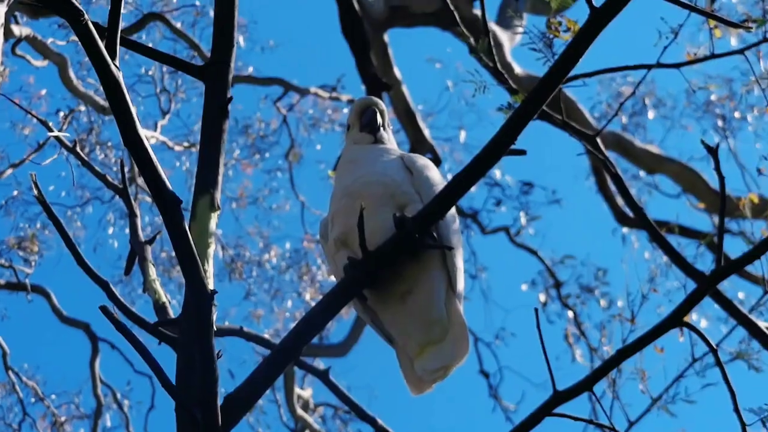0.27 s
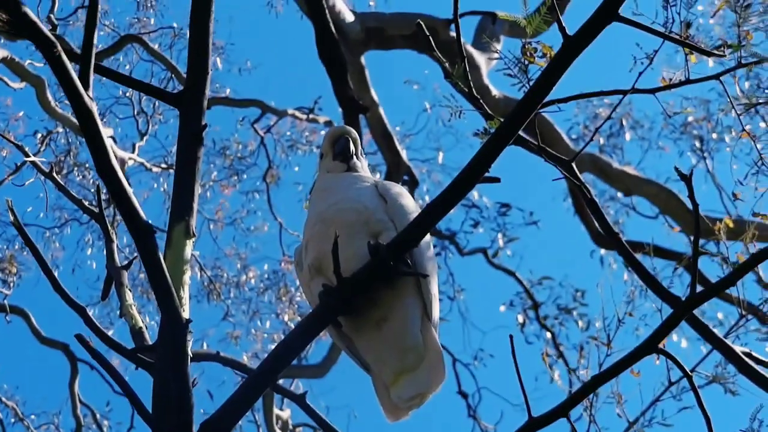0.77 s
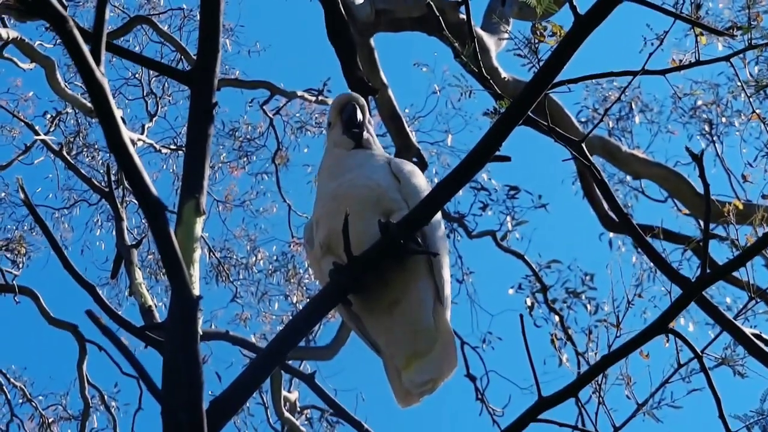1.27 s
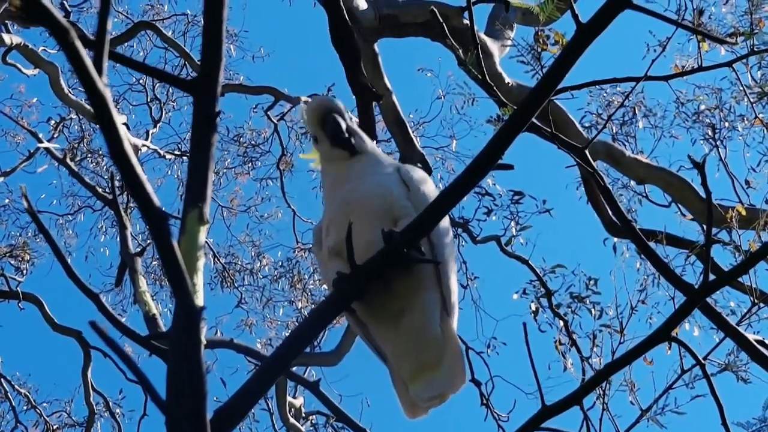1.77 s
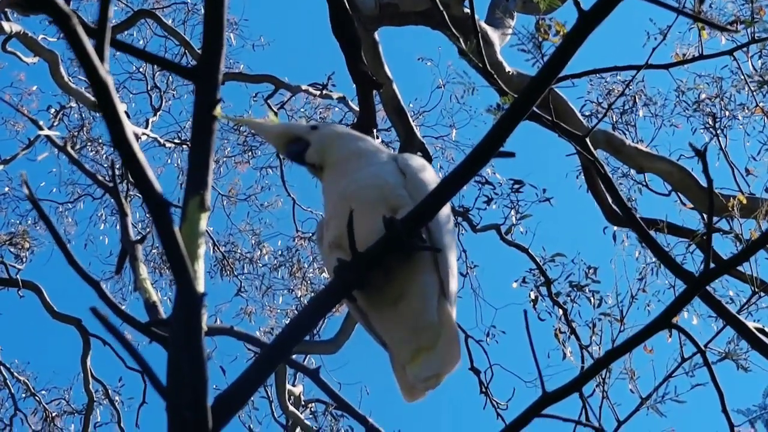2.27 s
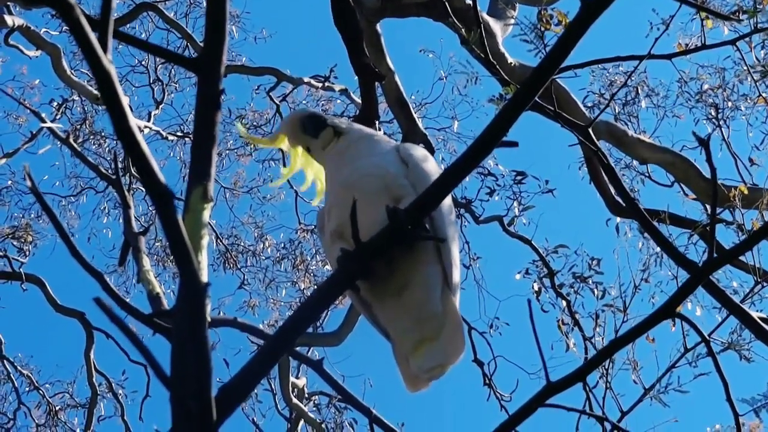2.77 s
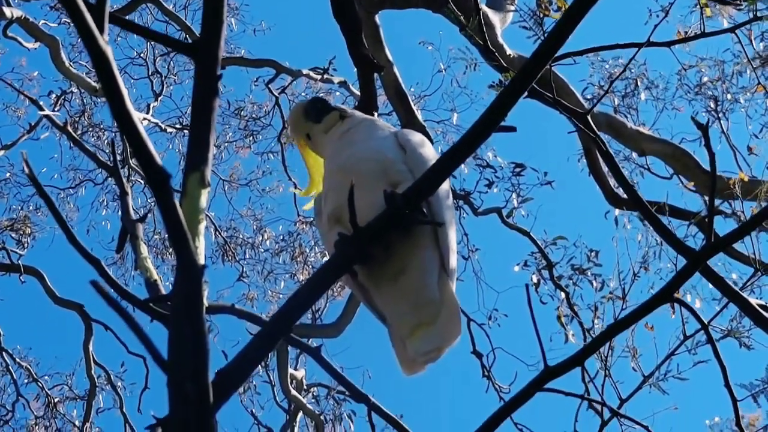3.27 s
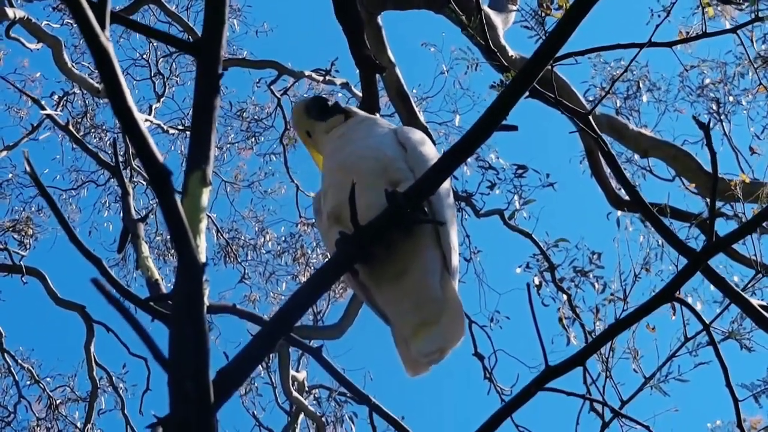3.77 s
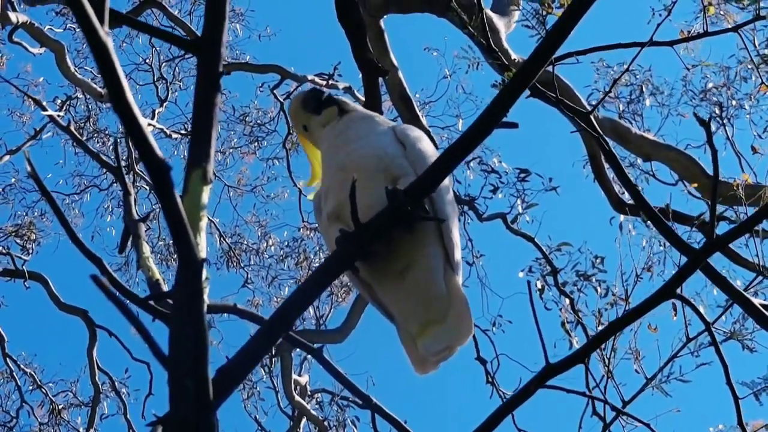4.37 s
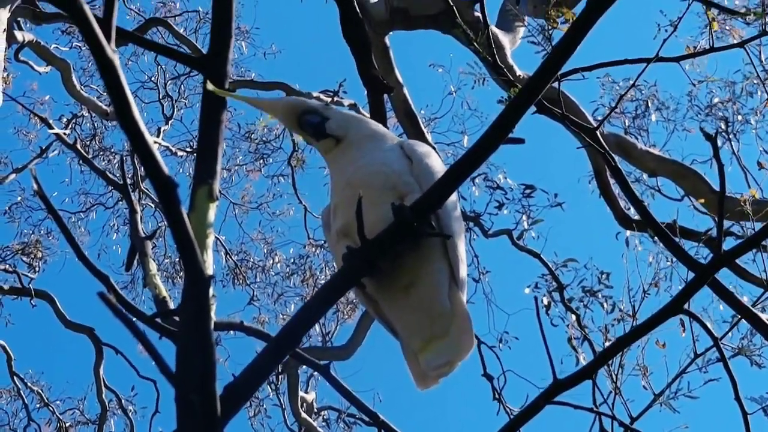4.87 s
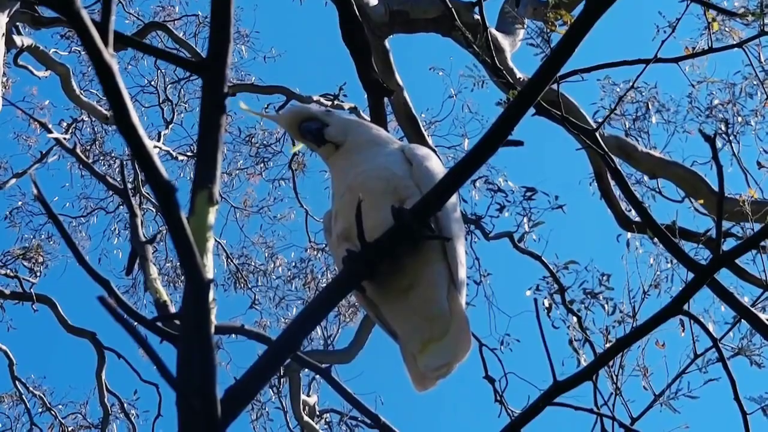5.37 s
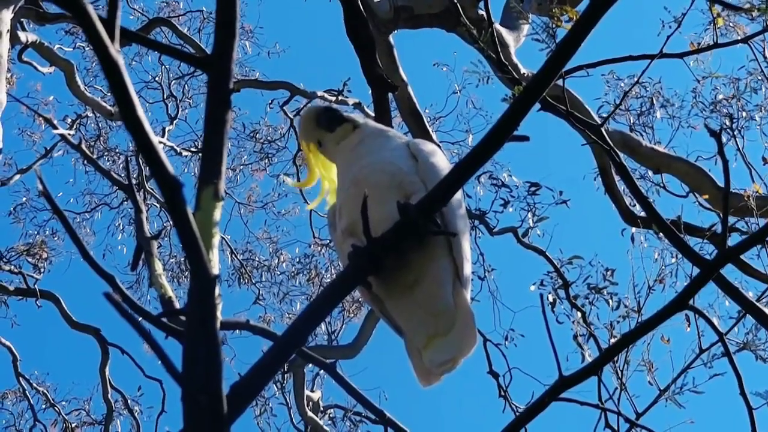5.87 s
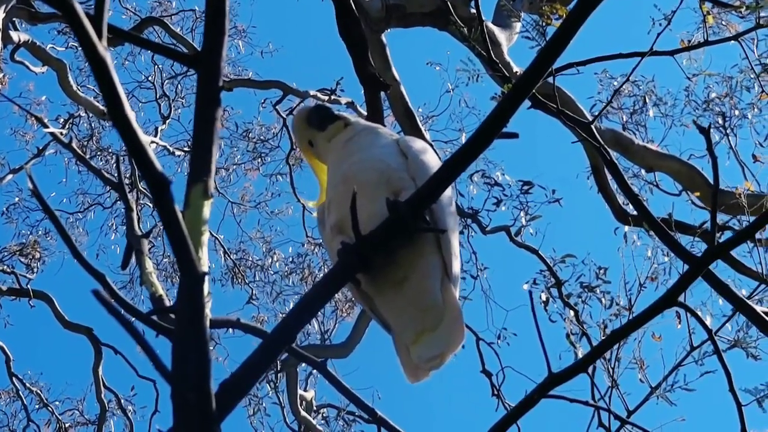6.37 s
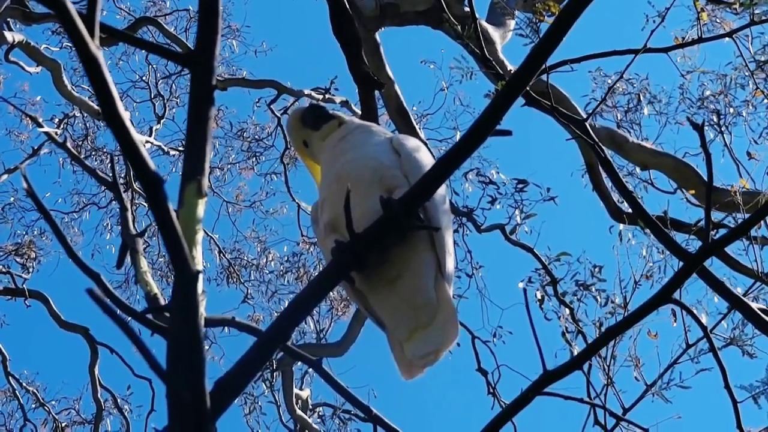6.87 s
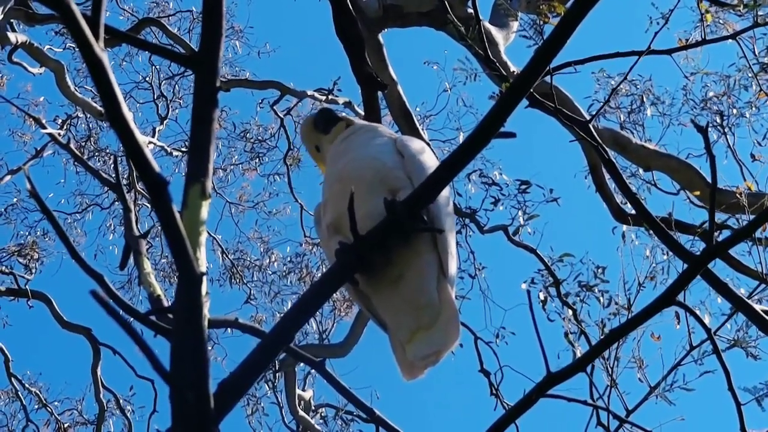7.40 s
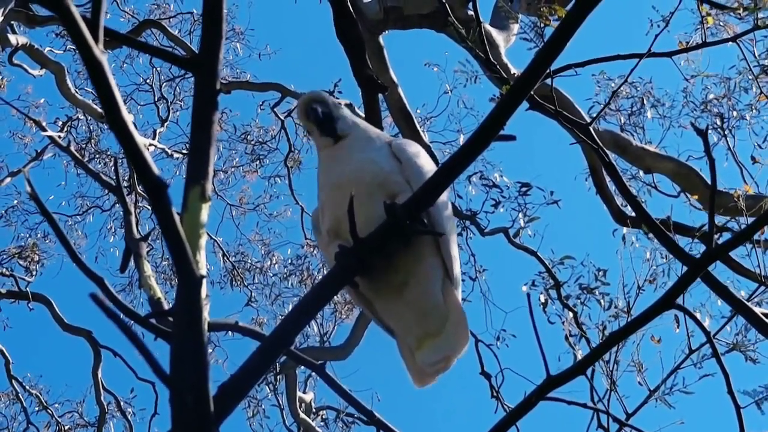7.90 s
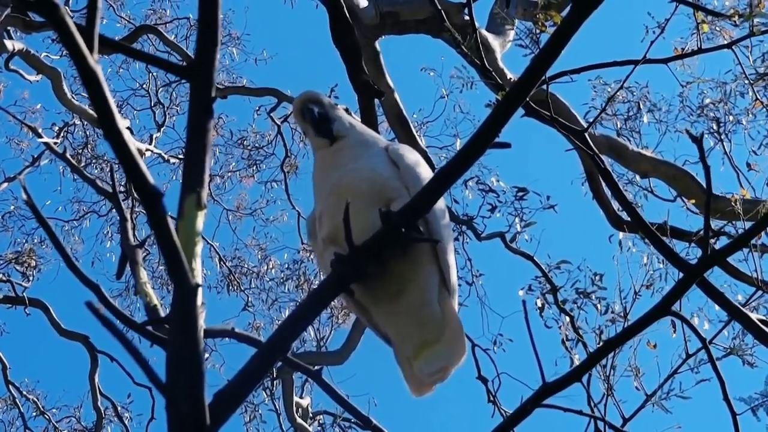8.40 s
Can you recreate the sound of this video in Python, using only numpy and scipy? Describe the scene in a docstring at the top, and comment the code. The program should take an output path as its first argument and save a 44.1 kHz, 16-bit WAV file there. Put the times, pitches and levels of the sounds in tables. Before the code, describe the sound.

Quiet outdoor air with faint hiss and low uneven rumble. In the first 0.6 s, distant small parrots give thin arched whistles, then harsh far chatter from 0.7 to 1.3 s. At 1.3 s a near cockatoo screeches for half a second: a quick upward glide, a crack into chaotic rasp, a piercing held note, a ragged break. Its echo fades among the trees while faint nasal calls repeat from 2.3 to 3.8 s. A second screech runs from 3.85 to 4.4 s, overlapped at 4.0 by a rough bark with a squeal. Single gruff barks follow at 4.5, 5.15, 6.1 and 7.2 s, some squeaky, with tiny soft rustles near 5 and 6 s and faint whistles around 6.3 to 7 s. At 7.8 s comes a very short squawk with a hollow ring, then the last screech from 8.0 to 8.5 s, with a strong bark inside it at 8.2.

```python
"""A cockatoo gives three long screeches and one short squawk, and rough barks, likely a dog's, sound among them.
Each screech is a train of throat pulses that glides up, breaks into a chaotic rasp, locks on a held note and
breaks again. The barks pass unsteady pulses and puffs of noise through mouth resonances; some carry a squeal.
Smaller parrots whistle and chatter farther off as arched tones, over filtered noise for the outdoor hiss.
Sparse noise taps return the echo off the trees, and a limiter holds the loud calls down to one ceiling."""
import sys
import numpy as np
from scipy import signal
from scipy.io import wavfile
from scipy.ndimage import uniform_filter1d, minimum_filter1d

SR = 44100
rng = np.random.default_rng(int(sys.argv[2]) if len(sys.argv) > 2 else 0)


def transcribe(signal):
    """Save signal, clipped to [-1, 1], as a 16-bit WAV file at the path in sys.argv[1]."""
    frames = np.atleast_2d(signal).T
    limited = np.clip(frames, -1, 1)
    pcm = np.round(limited * 32767).astype(np.int16)
    wavfile.write(sys.argv[1], SR, pcm)


N = 381024
EDGE_HZ = 15850  # upper limit of the sound


def amp(db):
    """Turns decibels into a gain factor."""
    return 10 ** (np.asarray(db) / 20)


def evened(x):
    """Scales a sound to an RMS level of one."""
    return x / np.sqrt(np.mean(x ** 2) + 1e-20)


def steadied(x, size=900):
    """Holds the short-time power at one, over windows of size samples."""
    power = abs(uniform_filter1d(x ** 2, size))
    return x / np.sqrt(power + 1e-12)


def read(points, hz):
    """Reads a curve of (Hz, value) points along a logarithmic frequency axis."""
    f, value = np.transpose(points)
    return np.interp(np.log(hz + 1), np.log(np.abs(f) + 1), value)


def add(mix, s, sound):
    """Lays a sound into the mix from second s on."""
    part = mix[max(round(s * SR), 0):][:len(sound)]
    part += sound[:len(part)]


def noise(count):
    """White noise, up to a second long."""
    return rng.standard_normal(SR)[:count]


def wander(count, size):
    """Slow random drift: noise smoothed twice over size samples."""
    smooth = uniform_filter1d(uniform_filter1d(noise(SR), size), size)
    return evened(smooth)[:count]


def envelope(length, attack, release, edge_db):
    """Level in dB: rises from edge_db, holds at zero and falls back."""
    t = np.arange(0, length, 1 / SR)
    edge = np.maximum(1 - t / attack, 1 - (length - t) / release)
    return edge_db * np.maximum(edge, 0)


def colour(x, spectrum, size=4096):
    """Minimum-phase filter with the given spectrum: it rings only after its input, as a resonator does."""
    log_gain = np.log(amp(read(spectrum, abs(np.fft.fftfreq(size, 1 / SR)))))
    ring = np.fft.ifft(np.exp(np.conj(signal.hilbert(log_gain)))).real
    return signal.oaconvolve(x, ring[:size // 2])[:len(x)]


def resonate(x, hz, width):
    """A steep resonance of gain one that follows the curve hz."""
    turn = np.exp(2j * np.pi * np.cumsum(hz) / SR)
    r = np.exp(-np.pi * width / SR)
    # shift the resonance down to zero, smooth there with two poles and shift back
    smooth = signal.lfilter([(1 - r) ** 2], [1, -2 * r, r * r], x / turn)
    return 2 * (turn * smooth).real


def air(rumble_db=-11, rumble_hz=70, gust_db=3):
    """Outdoor air: steadily coloured hiss plus a low noise rumble whose level comes in uneven gusts."""
    # Hiss spectrum. Each row: frequency in Hz, relative density in dB per Hz.
    hiss_spectrum = [(20, -16), (60, -0.5), (110, -2.5), (250, -3.5), (450, -9.5), (800, -3), (1150, -4.5),
                     (1600, -11), (2300, -17.5), (3100, -12.5), (4400, -16), (5700, -20), (8000, -38),
                     (15500, -50)]
    # Slow course of the air. Each row: time in seconds, level of the hiss in dB.
    air_course = [(0, -45.5), (1.25, -44.5), (2.2, -53), (3.7, -46.5), (4.8, -53.5), (5.7, -53.5),
                  (6.6, -53), (7.6, -50.5), (8.64, -45.5)]
    t = np.arange(N) / SR
    hiss = evened(colour(rng.standard_normal(N), hiss_spectrum))
    band = signal.butter(2, [rumble_hz * 0.55, rumble_hz * 1.24], "band", fs=SR, output="sos")
    low = signal.sosfilt(band, rng.standard_normal(N))
    gusts = evened(sum(np.sin(2 * np.pi * (f * t + rng.random())) for f in np.geomspace(.7, 9, 20)))
    rumble = amp(rumble_db) * evened(low * amp(gust_db * gusts))
    fade_in = np.clip((t - .045) / 0.039, 0, 1)
    return fade_in * amp(np.interp(t, *np.transpose(air_course))) * (hiss + rumble)


def trees(x):
    """Scattered echoes from trunks and ground; each band dies at its own speed."""
    # Echo decay. Each row: frequency in Hz, time to fall by 60 dB in seconds.
    decay_times = [(200, 0.87), (800, 0.85), (2700, 1.205), (5000, 1.17), (8000, 0.44), (14000, 0.49)]
    # Tone of the echo. Each row: frequency in Hz, gain in dB.
    echo_tone = [(200, 0), (800, 3), (1500, -2), (2800, -3.5), (5500, -2), (9000, 10.5), (14000, 2)]
    taps = noise(SR) * (rng.random(SR) < .1) * (np.arange(SR) > .008 * SR)
    hz, t, z = signal.stft(taps, SR, nperseg=256)
    decay = amp(-60 * t / read(decay_times, hz)[:, None])
    tail = evened(signal.istft(z * decay, SR, nperseg=256)[1])
    return signal.fftconvolve(x, colour(tail, echo_tone) / np.sqrt(len(tail)))[:N]


def branches(x, t60=0.075):
    """Quick reflections from the wood and ground close by: sparse random taps that die within t60 seconds."""
    t = np.arange(SR // 4) / SR
    taps = noise(len(t)) * (rng.random(len(t)) < .08) * (t > .002) * amp(-60 * t / t60)
    return signal.oaconvolve(x, taps / np.linalg.norm(taps))[:N]


def shuffles():
    """Soft short rustles between the barks: puffs of coloured noise that swell and fade."""
    # The rustles. Each row: start in seconds, length in seconds, level in dB.
    rustles = [(4.965, 0.04, -44.5), (5.022, 0.057, -51), (5.949, 0.044, -43), (5.991, 0.051, -50)]
    # Rustle spectrum. Each row: frequency in Hz, gain in dB.
    rustle_tone = [(60, -33), (150, 17.5), (350, -15), (900, 8), (1500, -6), (2100, 2.5), (4000, -10.5),
                   (8000, -19), (15000, -34)]
    out = np.zeros(N)
    for s, length, db in rustles:
        count = int(length * SR)
        puff = colour(noise(count), rustle_tone) * np.hanning(count)
        add(out, s, amp(db) * evened(puff))
    return out


def flock(faint_per_s=2, faint_db=-67, faint_length_s=0.08, faint_hz=(2900, 5400)):
    """Every distant call as (start s, length s, start Hz, top Hz, end Hz, level dB, roughness 0-1)."""
    # Distant whistles. Each row: start in seconds, length in seconds, start pitch in Hz, top pitch in Hz,
    # level in dB.
    whistles = [(0.06, 0.13, 1820, 2075, -50), (0.194, 0.022, 1740, 2300, -46.5),
                (0.358, 0.12, 3340, 4480, -47.5), (0.433, 0.062, 3435, 3520, -44),
                (0.471, 0.12, 4280, 4730, -38.5), (0.554, 0.034, 3000, 3740, -48),
                (3.685, 0.13, 3010, 3380, -54.5), (4.789, 0.14, 4150, 4610, -55),
                (5.792, 0.11, 4020, 4600, -52.5), (6.339, 0.086, 2700, 2720, -56),
                (6.471, 0.1, 2874, 3140, -48), (6.62, 0.11, 2750, 3154, -53.5),
                (6.792, 0.06, 4800, 5500, -61), (6.831, 0.04, 3800, 4330, -54),
                (6.898, 0.034, 3100, 4300, -51), (6.94, 0.075, 3800, 4360, -53)]
    # Harsh distant chatter. Each row: start in seconds, length in seconds, top pitch in Hz, level in dB.
    chatter = [(0.718, 0.24, 1189, -43), (0.897, 0.135, 1520, -41), (1.045, 0.11, 1147, -43.5),
               (1.146, 0.19, 1143, -56), (7.021, 0.2, 1500, -51.5)]
    # One repeated nasal call. Each row: start in seconds, length in seconds, top pitch in Hz, level in dB,
    # roughness from 0 to 1, level of its second voice against the first in dB.
    nasal_calls = [(2.266, 0.19, 1790, -60.5, 0.15, -18), (2.542, 0.27, 1630, -54.5, 0.77, -15),
                   (2.793, 0.18, 1725, -58.5, 0.28, -18), (3.028, 0.2, 1722, -51.5, 0.2, -4.5),
                   (3.299, 0.175, 1708, -52, 0.05, -2), (3.625, 0.21, 1720, -52.5, 0.3, -15),
                   (5.541, 0.18, 1680, -63, 0.3, -18)]
    # Second nasal voice: start, top and end pitch in Hz.
    second_voice_hz = (1585, 2080, 1515)
    second_delay_s, nasal_from_hz = 0.045, 1530
    # start and end pitches as shares of the top
    whistle_to, nasal_to, chatter_from, chatter_to = 0.975, 0.925, 0.92, 0.98
    whistle_rough, chatter_rough = 0.16, 0.95
    for s, length, from_hz, hz, db in whistles:
        yield s, length, from_hz, hz, whistle_to * hz, db, whistle_rough
    for s, length, hz, db in chatter:
        yield s, length, chatter_from * hz, hz, chatter_to * hz, db, chatter_rough
    for s, length, hz, db, rough, second_db in nasal_calls:
        yield s, length, nasal_from_hz, hz, nasal_to * hz, db, rough
        yield s + second_delay_s, length - second_delay_s, *second_voice_hz, db + second_db, rough
    # the rest of the flock: faint chirps at random times
    for when, size, pitch in rng.random((int(faint_per_s * N / SR), 3)):
        hz = np.interp(pitch, [0, 1], faint_hz)
        length = faint_length_s * (.5 + size)
        yield when * N / SR, length, chatter_from * hz, hz, whistle_to * hz, faint_db, whistle_rough


def parrots(jitter=0.0423, flutter=0.43, whistle_hz=1700, overtone_db=-29):
    """Arched chirps: nearly pure whistles when high, a rasping stack through the throat when low."""
    # Small parrot's throat. Each row: frequency in Hz, gain in dB.
    parrot_throat = [(1000, -17), (2300, 2.5), (3300, 7), (4700, 8), (6500, -9.5), (9000, -21.5),
                     (12000, -33), (15500, -61)]
    out = np.zeros(N)
    for s, length, start_hz, top_hz, end_hz, db, rough in flock():
        u = np.linspace(0, 1, int(length * SR))
        count = len(u)
        corners_hz = [start_hz, .8 * start_hz + .2 * top_hz, top_hz, end_hz]
        arch = uniform_filter1d(np.interp(u, [0, .2, .7, 1], corners_hz), count // 5 + 1, mode="nearest")
        turns = np.cumsum(arch * (1 + jitter * rough * wander(count, size=45))) / SR
        call = np.zeros(count)
        for k in range(1, int(EDGE_HZ / top_hz) + 1):
            harmonic_db = overtone_db * k if start_hz > whistle_hz else read(parrot_throat, k * arch)
            call += amp(harmonic_db) * np.sin(2 * np.pi * k * turns)
        swell = np.sin(np.pi * u) * (1 + flutter * np.tanh(wander(count, size=250)))
        add(out, s, amp(db) * evened(call * swell))
    return out


def squeal(length, db, mid_hz, jitter=0.027, overtone_db=-13, flutter=0.38, sag_hz_per_s=1300):
    """A thin, unsteady whistle that rides on a bark: a sagging tone with one overtone."""
    level_db = db + envelope(length, attack=0.02, release=0.02, edge_db=-26)
    count = len(level_db)
    hz = mid_hz - sag_hz_per_s * (np.arange(count) / SR - length / 2)
    turns = np.cumsum(hz * (1 + jitter * wander(count, size=25))) / SR
    tone = np.sin(2 * np.pi * turns) + amp(overtone_db) * np.sin(4 * np.pi * turns)
    return amp(level_db) * evened(tone * np.exp(flutter * wander(count, size=60)))


def bark_gesture(length, attack, effort_db, from_hz, to_hz, rough_from, rough_to, mouth_from, mouth_to, rasp_db):
    """Effort, pitch, roughness, mouth and rasp of one bark: the pitch holds, then slips late in the bark."""
    level_db = effort_db + envelope(length, attack, release=0.047, edge_db=-33)
    u = np.linspace(0, 1, len(level_db))
    hz = from_hz + (to_hz - from_hz) * u ** 3
    rough = rough_from + (rough_to - rough_from) * u
    mouth = mouth_from + (mouth_to - mouth_from) * u
    # the rasp is strongest in the middle and 8 dB weaker at both ends
    rasp = rasp_db - 8 * (1 - np.sin(np.pi * u))
    return level_db, hz, rough, mouth, rasp


def bark(effort_db, hz, rough, mouth, rasp_db, jitter=.16, chest_db=-27, flutter_db=3):
    """Unsteady fold pulses and puffs of noise drive the moving resonances of a mouth and a low chest."""
    # Low and high resonances of the barking mouth. Each row: frequency in Hz at mouth size 1, width in Hz,
    # gain in dB (flutter and rasp vary the high ones around it).
    low_resonances = [(784, 372, 0.5), (1181, 360, -0.5)]
    high_resonances = [(1972, 500, -13.5), (2920, 360, -21.5), (3324, 750, -24.5), (5450, 1300, -31),
                       (7970, 1600, -31.5), (11100, 8800, -44.5)]
    # Lower and upper edge in Hz of the band that the body of the bark passes.
    body_band_hz = (648, 1620)
    # Chest. Each row: frequency in Hz, gain in dB.
    chest_tone = [(40, -27), (130, -3), (240, 5.5), (400, -2), (700, -20), (2000, -68)]
    count, rough = len(hz), np.clip(rough, 0, 1)
    turns = np.cumsum(hz * (1 + jitter * rough * wander(count, size=70))) / SR
    folds = sum(np.cos(2 * np.pi * k * turns) for k in range(1, 30))
    puffs = (0.27 + np.exp(-(turns % 1) / 0.51)) * noise(count)
    drive = (1 - rough) * evened(folds) + rough * evened(puffs)
    # neighbouring resonances have opposite signs
    body = sum((-1) ** k * amp(db) * resonate(drive, f * mouth, w) for k, (f, w, db) in enumerate(low_resonances))
    body = signal.sosfilt(signal.butter(4, body_band_hz, "band", fs=SR, output="sos"), body)
    # the upper resonances flare up each on its own
    rasp = sum(amp(db + flutter_db * wander(count, size=500)) * resonate(drive, f * mouth, w)
               for f, w, db in high_resonances)
    chest = amp(chest_db) * evened(colour(puffs, chest_tone))
    voice = steadied(body + amp(rasp_db) * rasp, size=350) + chest
    return amp(effort_db) * voice * signal.windows.tukey(count, .06)


def barks():
    """All the barks, with the squeals that ride on some of them."""
    # The barks. Each row: start in seconds, length in seconds, attack in seconds, effort in dB, start and end
    # pitch in Hz, start and end roughness from 0 to 1, start and end mouth size as factors on the
    # resonances, mid-bark rasp in dB.
    bark_rows = [ (3.998, 0.142, 0.016, -4, 490, 370, 0.05, 0.7, 1.02, 0.94, 3.5),
                 (4.496, 0.155, 0.019, -9, 406, 330, 0.82, 0.72, 1.0, 0.96, 3.5),
                 (5.153, 0.185, 0.021, -6.5, 448, 335, 0.8, 0.82, 1.1, 0.9, 4.5),
                 (6.1, 0.163, 0.028, -5.5, 400, 335, 0.95, 0.6, 1.08, 0.94, 1),
                 (7.198, 0.143, 0.044, -8, 405, 490, 0.5, 0.6, 0.84, 1.06, 4.5),
                 (8.195, 0.146, 0.032, 0.5, 412, 400, 0.7, 0.8, 0.96, 0.9, 5)]
    # The squeals. Each row: start in seconds, length in seconds, level in dB, middle pitch in Hz.
    squeal_rows = [(4.022, 0.086, -7.5, 1810), (4.513, 0.05, -19, 2030), (5.163, 0.115, -18, 2180),
                   (7.255, 0.055, -15, 2730)]
    dog = np.zeros(N)
    for s, *row in bark_rows:
        add(dog, s, bark(*bark_gesture(*row)))
    for s, *row in squeal_rows:
        add(dog, s, squeal(*row))
    return dog


def squawk_ring(length, db, hz):
    """The hollow ring that ends the squawk: one nearly pure tone as the beak closes."""
    level_db = db + envelope(length, attack=0.012, release=0.024, edge_db=-32)
    tone = np.sin(2 * np.pi * hz * np.arange(len(level_db)) / SR)
    return amp(level_db) * evened(tone)


def squawk(length, effort_db, hz, chaos, gape):
    """A few nearly even pulses of the low note through a narrow beak."""
    level_db = effort_db + envelope(length, attack=0.013, release=0.011, edge_db=-19)
    steady = np.ones(len(level_db))
    return screech(level_db, hz * steady, chaos * steady, 0 * steady, gape * steady)


def screech_gesture(start, onset_db, glide_s, top_hz, rasp_db, rasp_hz, rasp_chaos, settle_s, held_db, limp_at,
                    limp, held):
    """Effort, pitch, chaos, alternation and gape through glide, rasp, held note and final break."""
    glide_from_hz, glide_db, glide_swell_db, glide_chaos, glide_gape = 590, -9.5, 2, 0.38, 0.18
    attack_s, break_s, limp_s, rasp_gape = 0.024, 0.008, 0.028, 0.29
    calming = 0.85  # share of the rasp's chaos that is left as it starts to settle
    held_chaos, held_fade_s, held_fade_db = 0.026, 0.06, -6
    end_s, end_fade_db, end_sag_hz, end_chaos = 0.044, -28, 42, 1.0
    glide_waver, held_waver = 0.014, 0.0015  # shares of the pitch

    held_s, held_hz, held_gape = np.transpose(held)
    crack, lock, release = start + glide_s, held_s[0], held_s[-1]
    rasp, settle = crack + break_s, lock - settle_s
    broken, end = release + break_s, release + end_s
    t = np.arange(start, end, 1 / SR)
    rise_db = np.interp(t, [start, start + attack_s, crack, rasp],
                        [onset_db, glide_db, glide_db + glide_swell_db, 0])
    fall_db = np.interp(t, [release - held_fade_s, release, broken, end],
                        [0, held_fade_db, held_fade_db, end_fade_db])
    effort_db = np.interp(t, [settle, lock], [rasp_db, held_db]) + rise_db + fall_db
    hz = np.interp(t, [start, crack, rasp, *held_s, end],
                   [glide_from_hz, top_hz, rasp_hz, *held_hz, held_hz[-1] - end_sag_hz])
    waver = np.interp(t, [crack, lock], [glide_waver, held_waver])
    hz = hz * (1 + waver * wander(len(t), size=160))
    chaos = np.interp(t, [crack, rasp, settle, lock, release, broken],
                      [glide_chaos, rasp_chaos, calming * rasp_chaos, held_chaos, held_chaos, end_chaos])
    # strong-weak pulses come as the note locks and once more within it
    alternation = limp * sum(np.exp(-((t - s) / limp_s) ** 2) for s in (lock, limp_at))
    gape = np.interp(t, [crack, rasp, settle, *held_s, broken],
                     [glide_gape, rasp_gape, rasp_gape, *held_gape, rasp_gape])
    return effort_db, hz, chaos, alternation, gape


def screech(effort_db, hz, chaos, alternation, gape, jitter=0.043, stray=0.83, uneven=0.28, limp=0.028,
            hiss_db=-40, chaos_hiss_db=-15, half_gape=0.36, ring_hz=2750, ring_width_hz=1300, low_note_hz=520):
    """Syrinx pulses, even or chaotic, pass the windpipe and a throat that changes as the beak opens."""
    # The throat with the beak narrow, half open and wide open. Each row: frequency in Hz, gain in dB.
    narrow_throat = [(200, -61), (420, -21), (830, -13), (1240, -15.5), (1650, -2.5), (2480, -5),
                     (2900, 0.5), (3300, -10.5), (3750, -13.5), (4550, -17.5), (5700, -33), (6300, -16.5),
                     (8300, -37.5), (15500, -60.5)]
    half_open_throat = [(250, -45.5), (600, -25.5), (830, -27.5), (1200, -8.5), (1600, -15), (2000, -8.5),
                        (2470, 2.5), (2640, -0.5), (2860, 3.5), (3450, -2), (4250, -9.5), (5000, -6),
                        (6300, -17), (7400, -18), (10500, -30.5), (15500, -46)]
    wide_open_throat = [(200, -41), (420, -34.5), (850, -33), (1270, -21.5), (1750, -15.5), (2550, -1.5),
                        (3000, -2), (4600, -22.5), (5450, -7.5), (6500, -28.5), (7600, -14.5),
                        (8600, -31.5), (10200, -39), (12000, -32.5), (15500, -67)]
    count, turns = len(hz), np.cumsum(hz) / SR
    at = np.flatnonzero(np.diff(np.floor(turns)))
    odd = (-1) ** np.arange(len(at)) * alternation[at] * (hz[at] < low_note_hz)
    rough = np.clip(chaos[at], 0, 1)
    # on the low note every other pulse comes late and strong, which puts lines between the harmonics
    late = jitter * rough * noise(len(at)) + limp * odd + 1 - turns[at] % 1
    # in chaos two stray pulses fall anywhere within each cycle
    late = np.concatenate([late, late + rng.random(len(at)), late + rng.random(len(at))])
    stray_strength = stray * rough ** 2
    strength = np.concatenate([(1 + odd) * (1 - .5 * rough), stray_strength, stray_strength])
    at, rough = np.tile(at, 3), np.tile(rough, 3)
    strength = strength * np.exp(uneven * np.sqrt(rough) * noise(len(at)))
    # windowed sincs set each pulse between the samples
    place = at + late * SR / hz[at]
    near = np.floor(place).astype(int)[:, None] + np.arange(-8, 10)
    offset = near - place[:, None]
    shapes = -strength[:, None] * np.sinc(offset) * np.sinc(offset / 10)
    pulses = np.bincount(np.maximum(near, 0).ravel(), shapes.ravel(), count)[:count]
    hiss = (amp(hiss_db) + amp(chaos_hiss_db) * abs(chaos)) * noise(count)
    drive = evened(pulses) + hiss
    # the windpipe, an all-pass, holds each pulse a moment longer near its main resonance
    r = np.exp(-np.pi * ring_width_hz / SR)
    poles = [1, -2 * r * np.cos(2 * np.pi * ring_hz / SR), r * r]
    drive = signal.lfilter(poles[::-1], poles, drive)
    # crossfade the three throats with the gape
    throats = (narrow_throat, half_open_throat, wide_open_throat)
    voice = sum(np.interp(gape, [0, half_gape, 1], share) * colour(drive, throat)
                for share, throat in zip(np.eye(3), throats))
    return amp(effort_db) * steadied(voice) * signal.windows.tukey(count, .03)


def cockatoo():
    """The three screeches and the short squawk with its closing ring."""
    # The screeches. Each row: start in seconds, onset in dB against the rasp, glide length in seconds,
    # glide top in Hz, rasp in dB, rasp pitch in Hz, rasp chaos (1 is full; more adds only hiss), time to
    # calm down in seconds, held note in dB, time of a later strong-weak spell in seconds, depth of the
    # strong-weak spells from 0 to 1.
    screeches = [ (1.289, -40, 0.078, 1010, -3.5, 409, 1.15, 0.055, -2.5, 1.645, 0.2),
                 (3.852, -30, 0.058, 872, -6, 399, 0.74, 0.01, -9, 4.285, 0.07),
                 (7.971, -21, 0.077, 995, -6.5, 406, 1.0, 0.035, -1, 8.36, 0.2)]
    # One list for the held note of each screech. Each row: time in seconds, pitch in Hz, beak gape from 0 to 1.
    held_notes = [
        [(1.51, 411.3, 0.76), (1.62, 415.3, 0.76), (1.69, 425, 0.97), (1.775, 419.7, 0.96),
         (1.792, 410.5, 0.95)],
        [(4.218, 410, 0.82), (4.25, 412, 0.68), (4.275, 405.7, 0.62), (4.31, 415.6, 0.76), (4.345, 408.2, 0.94)],
        [(8.185, 418, 0.8), (8.2, 420, 0.97), (8.23, 418.6, 0.15), (8.29, 420, 0.1), (8.32, 423.5, 0.87),
         (8.37, 420.5, 0.96), (8.415, 424.5, 0.96), (8.465, 419.9, 1), (8.482, 410, 0.7)],
    ]
    # The squawk: start in seconds, length in seconds, effort in dB, pitch in Hz, chaos from 0 to 1,
    # beak gape from 0 to 1.
    squawk_row = (7.772, 0.04, -18, 438, 0.08, 0.16)
    # Its ring: start in seconds, length in seconds, level in dB, pitch in Hz.
    ring_row = (7.785, 0.043, -17, 1745)
    bird = np.zeros(N)
    for row, held in zip(screeches, held_notes):
        add(bird, row[0], screech(*screech_gesture(*row, held)))
    add(bird, squawk_row[0], squawk(*squawk_row[1:]))
    add(bird, ring_row[0], squawk_ring(*ring_row[1:]))
    return bird


def scene(echo_db=-27, bark_echo_db=-32, far_echo_db=-6, early_db=-18, far_early_db=-4, pan_db=1.7,
          echo_side_db=-12, scatter_side_db=-1, air_side_db=3):
    """Near callers, far parrots, their echoes and the air, mixed from middle and side into two channels."""
    # Stereo width. Each row: frequency in Hz, gain of the side signal in dB.
    side_tone = [(30, -62), (120, -31), (300, -14.5), (800, -16.5), (3000, -18), (5500, -19), (8000, -12),
                 (15000, -10.5)]
    bird, dog, far = cockatoo(), barks(), parrots()
    near = bird + dog + shuffles()
    to_trees = amp(echo_db) * bird + amp(bark_echo_db) * dog + amp(far_echo_db) * far
    early = branches(amp(early_db) * near + amp(far_early_db) * far)
    mid = far + early + trees(to_trees) + air()
    # the channels differ in each call's phase and in a short dense scatter
    spread = signal.hilbert(near + far).imag + amp(scatter_side_db) * branches(near + far, t60=0.014)
    side = colour(spread + amp(air_side_db) * air(), side_tone) + amp(echo_side_db) * trees(to_trees)
    # the near callers sit slightly toward the second channel
    return np.array([mid + side + near * amp(-pan_db / 2), mid - side + near * amp(pan_db / 2)])


def record(dry, ceiling_db=-5.5, slope=1.0, recovery_db_per_s=130):
    """A peak limiter that falls at once and recovers quickly; then the band limit."""
    peak_db = 20 * np.log10(1e-6 - minimum_filter1d(-abs(dry).max(0), size=120))
    fall = np.arange(N) * recovery_db_per_s / SR
    held_peak_db = np.maximum.accumulate(peak_db + fall) - fall
    over_db = np.maximum(held_peak_db - ceiling_db, 0)
    limited = dry / amp(slope * uniform_filter1d(over_db, size=100))
    low_pass = signal.firwin(511, EDGE_HZ, window=("kaiser", 9), fs=SR)
    return signal.oaconvolve(limited, low_pass[None], "same")


dry = scene()
out = record(dry)
transcribe(out)
```